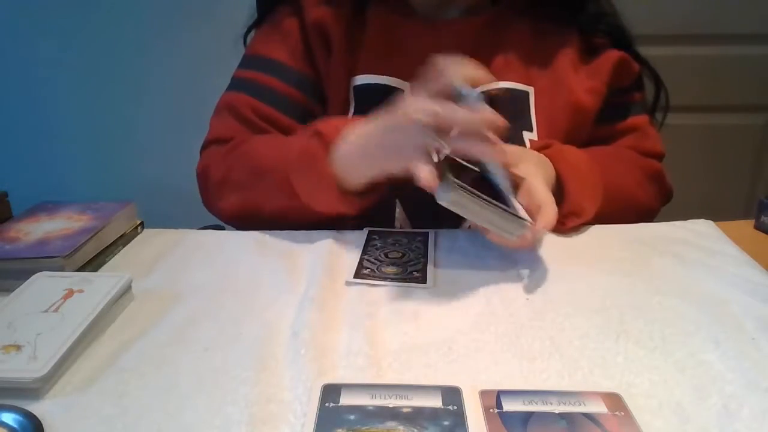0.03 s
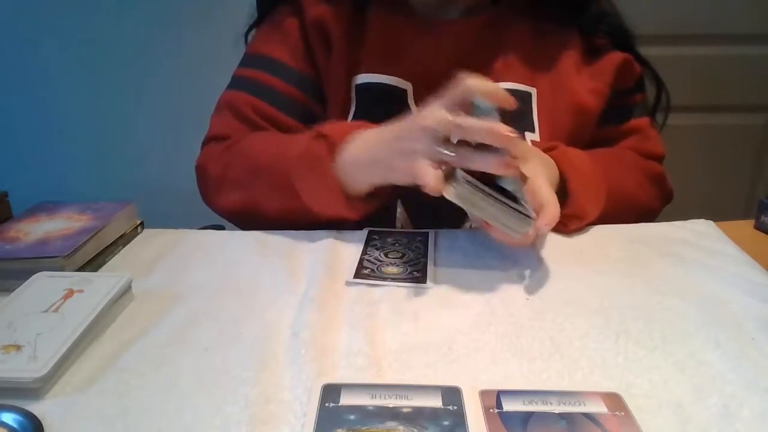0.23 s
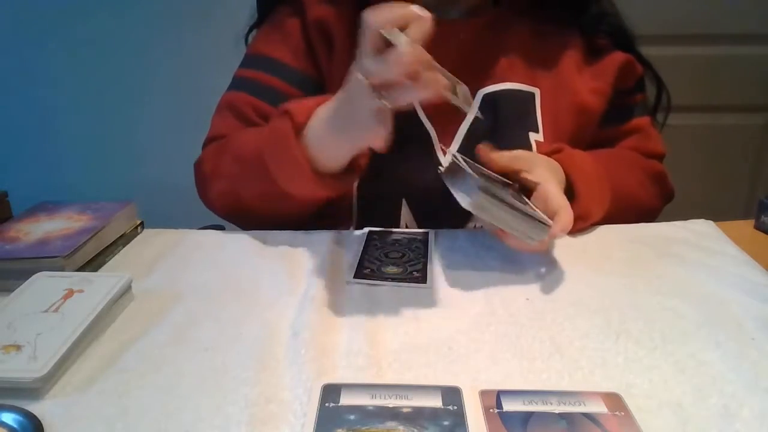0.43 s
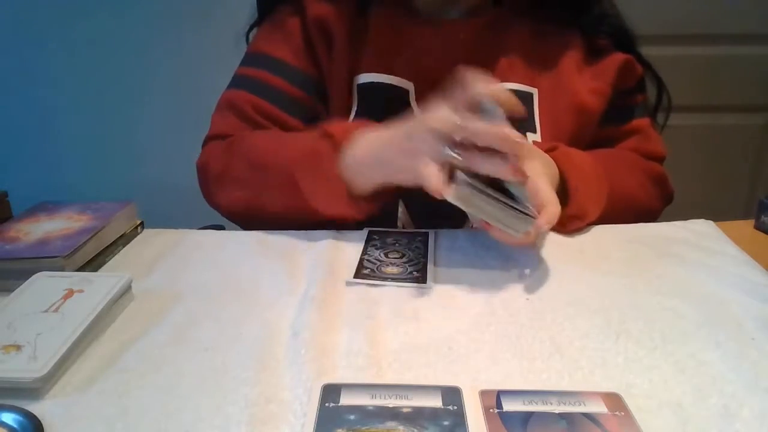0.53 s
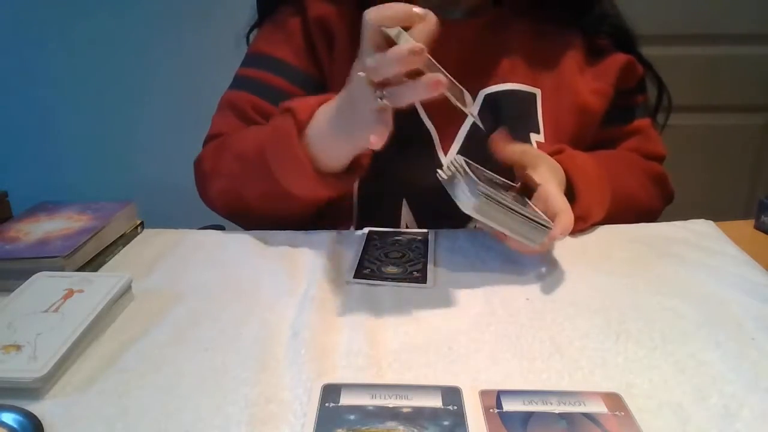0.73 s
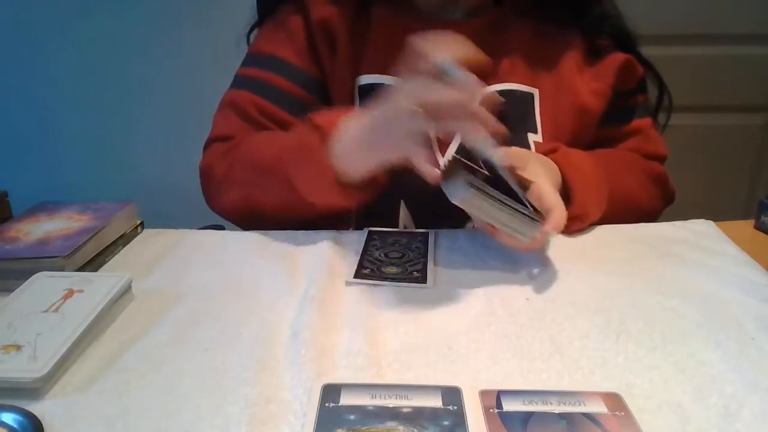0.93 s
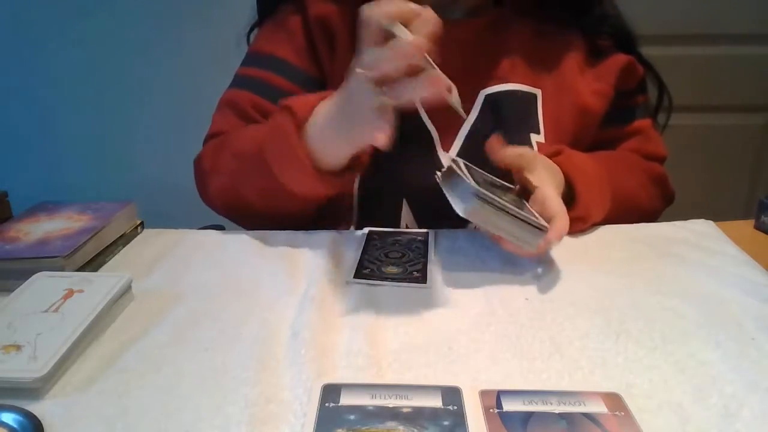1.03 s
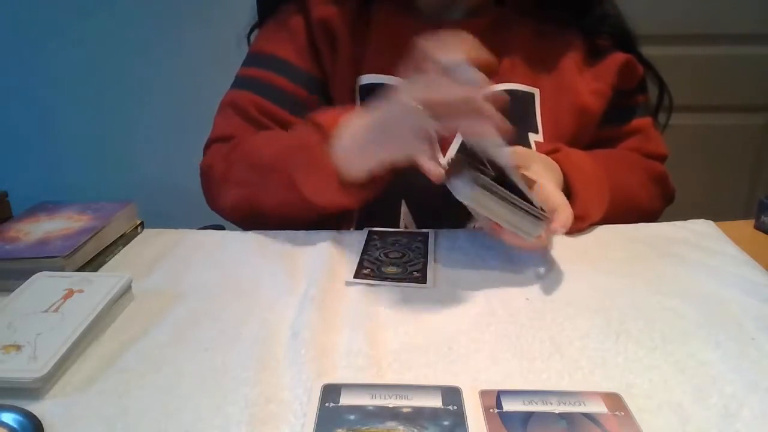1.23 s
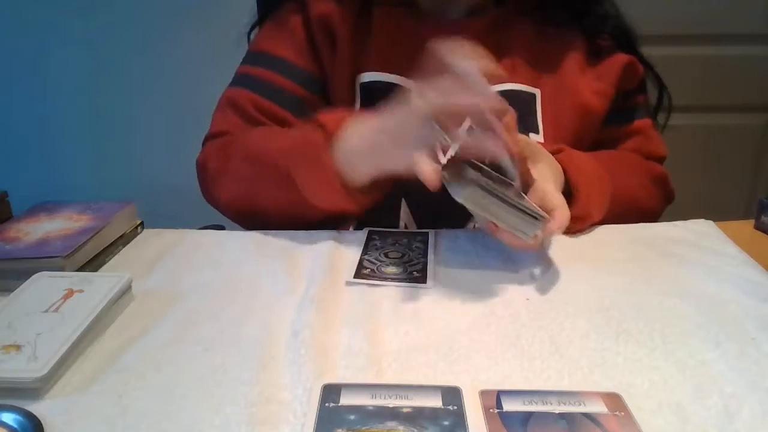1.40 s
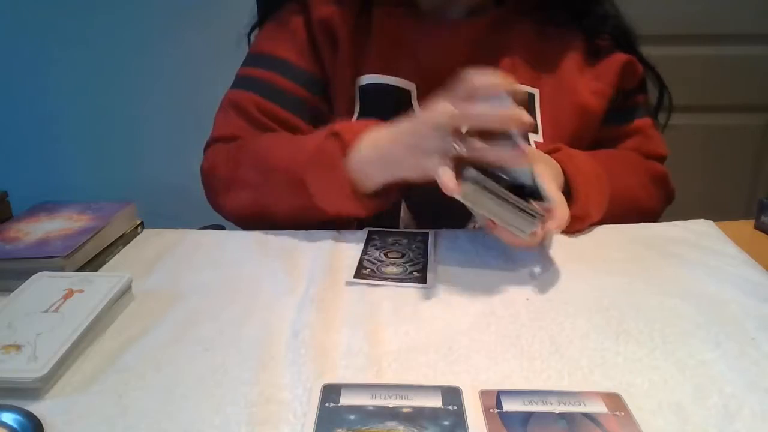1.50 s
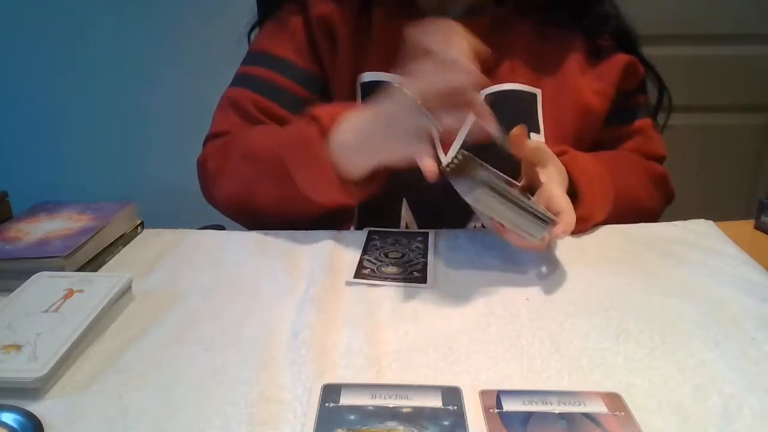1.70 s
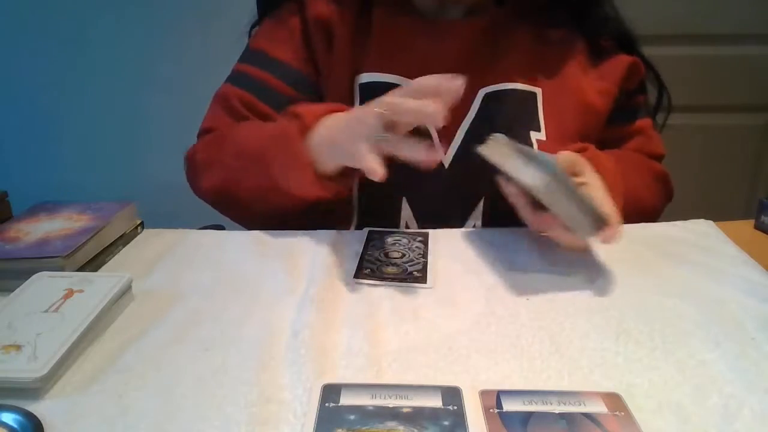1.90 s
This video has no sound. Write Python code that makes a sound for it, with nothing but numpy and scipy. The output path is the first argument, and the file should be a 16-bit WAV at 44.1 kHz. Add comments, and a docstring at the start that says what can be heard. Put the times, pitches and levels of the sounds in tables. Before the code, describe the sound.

A deck of cards is shuffled overhand in a small, quiet room. Packets slide off with a short papery hiss and slap onto the pile in an uneven run, ending with a soft landing.

```python
"""A deck of cards is shuffled overhand above a cloth-covered table in a small, faintly rumbling room.
From the start, packets slide off the deck with a papery hiss and land on the pile with a slap:
the air between cards and palm thuds and rings, then a wall throws the slap back.
The first slaps are light; the hardest come near 0.5, 0.7, 1.1 and 1.7 s.
A last short slide and a soft landing end the shuffle at 1.9 s."""
import sys
import numpy as np
from scipy import signal
from scipy.fft import rfft, irfft
from scipy.io import wavfile
from scipy.ndimage import uniform_filter1d

SR = 44100
rng = np.random.default_rng(int(sys.argv[2]) if len(sys.argv) > 2 else 0)


def digitize_waveform(pressure):
    """Quantize a signal to 16-bit integers and store it at the path in sys.argv[1].

    Rows of a 2-D input are taken as channels; values are limited to [-1, 1].
    """
    field = np.atleast_2d(pressure).T
    bounded = np.clip(field, -1, 1)
    quanta = np.round(bounded * 32767).astype(np.int16)
    wavfile.write(sys.argv[1], SR, quanta)


N = 85995


def amp(db):
    """Decibels to gain."""
    return 10 ** (np.asarray(db) / 20)


def lookup(points, hz):
    """Interpolates a table on a log-frequency axis."""
    freqs, values = np.transpose(points)
    return np.interp(np.log(hz + 1), np.log(freqs), values)


def add(mix, start_s, sound):
    """Mixes a stereo sound in at start_s."""
    part = mix[:, max(round(start_s * SR), 0):][:, :sound.shape[1]]
    part += sound[:, :part.shape[1]]


def unit(x):
    """Scales to unit energy per channel."""
    return x / np.sqrt(np.sum(x ** 2, -1, keepdims=True) + 1e-20)


def butter(x, hz, kind):
    """Causal band-pass or high-pass."""
    return signal.lfilter(*signal.butter(2, hz, kind, fs=SR), x)


def colour(x, spectrum, size=2048):
    """Minimum-phase filter with the given spectrum."""
    log_gain = np.log(amp(lookup(spectrum, abs(np.fft.fftfreq(size, 1 / SR)))))
    taps = np.fft.ifft(np.exp(np.conj(signal.hilbert(log_gain)))).real[:size // 2]
    return signal.fftconvolve(x, taps[None], axes=1)[:, :x.shape[1]]


# Still room. Each row: frequency in Hz, relative level in dB.
RUMBLE_SPECTRUM = [(20, -4), (45, -6.5), (80, -16), (200, -22.5), (600, -28), (2000, -39), (16000, -47)]

def room_rumble(rms_db=-69):
    """Faint rumble of the still room."""
    mid, side = rng.standard_normal((2, N))
    noise = np.array([mid + .71 * side, mid - .6 * side])
    return amp(rms_db) * np.sqrt(N) * unit(colour(noise, RUMBLE_SPECTRUM, size=8192))


# Tail decay. Each row: frequency in Hz, time to fall 60 dB in seconds.
TAIL_T60 = [(150, 0.03), (450, 0.35), (900, 0.21), (2800, 0.2571), (7000, 0.18), (15000, 0.16)]
# Tail colour. Each row: frequency in Hz, gain in dB.
TAIL_SPECTRUM = [(100, 0), (250, -0.5), (480, -3), (900, -1.5), (2500, -4.5), (5000, -8), (9000, -6),
                 (15000, -9)]

def room_tail(t, rise_s=.0066, narrow_below_hz=910, bass_width=.5):
    """Impulse response of the short diffuse tail, narrower in the bass."""
    hz, frame_s, (mid, side) = signal.stft(rng.choice([-1., 1.], (2, len(t))), SR, nperseg=256)
    width = np.maximum(hz / np.hypot(hz, narrow_below_hz), bass_width)[:, None]
    noise = np.array([mid + width * side, mid - width * side]) / np.hypot(1, width)
    t60_s = lookup(TAIL_T60, hz)[:, None]
    decaying = noise * amp(-60 * frame_s / t60_s) / np.sqrt(t60_s)
    tail = signal.istft(decaying, SR, nperseg=256)[1][:, :len(t)]
    return colour(unit(tail * (1 - np.exp(-t / rise_s))), TAIL_SPECTRUM)


# Wall reflection. Each row: frequency in Hz, gain in dB.
WALL_SPECTRUM = [(100, 3), (300, -2), (800, -4.5), (1500, -16.5), (3000, -15.5), (6000, -23),
                 (15000, -24.5)]

def wall_echo(t, delay_s=.0232, spread_s=.0022):
    """Impulse response of the wall: one clear echo with scatter around it."""
    scatter = rng.standard_normal((2, len(t))) * np.exp(-abs(t - delay_s) / spread_s)
    echo = unit(butter(scatter, 910, "high"))
    echo[:, round(delay_s * SR)] += 1
    return colour(echo, WALL_SPECTRUM)


def friction(envelope, width, grain_s=.0012, grain_db=2.5, catches_per_s=260, catch_db=15):
    """Grainy stereo paper friction; card edges catch on each other now and then."""
    size = len(envelope)
    mid, side, grain = rng.standard_normal((3, N))[:, :size]
    side = butter(side, 1110, "high")  # mono bass
    grain_size = round(grain_s * SR)
    grain = uniform_filter1d(grain, grain_size) * np.sqrt(grain_size)
    catches = (rng.random(N) < catches_per_s / SR) * rng.random(N)
    catches = np.convolve(catches[:size], signal.windows.hann(12), "same")
    grip = amp(grain_db * grain) + amp(catch_db) * catches
    return envelope * grip * np.array([mid + width * side, mid - width * side])


def air_gap(envelope, lowest_hz, step_hz=1226, step_db=-6):
    """Friction rings the air gap between the cards at four resonances, the higher ones wider."""
    drive = friction(envelope, width=.85)
    ring = 0
    for k in range(4):
        centre_hz = lowest_hz + k * step_hz
        half_band_hz = (120 + .07 * centre_hz) / 2
        ring += amp(k * step_db) * butter(drive, [centre_hz - half_band_hz, centre_hz + half_band_hz], "band")
    return unit(ring)


def moving_contact(hiss, depth_db=4, patch_hz=700, patch_s=.06, size=512):
    """The hiss shifts colour in random patches as the contact moves."""
    bins = signal.stft(hiss, nperseg=size)[2]
    patches = rng.standard_normal((bins.shape[1], 64))
    patches = uniform_filter1d(patches, round(patch_hz * size / SR), axis=0)
    patches = uniform_filter1d(patches, round(patch_s * SR / size), axis=1)
    gain = amp(depth_db * patches[:, :bins.shape[2]] / patches.std())
    return signal.istft(bins * gain, nperseg=size)[1][:, :hiss.shape[1]]


# Card sliding on card. Each row: frequency in Hz, relative level in dB.
HISS_SPECTRUM = [(100, -16), (400, -17), (1000, -25), (2500, -18), (4000, -18), (6500, -9.5), (8500, 1),
                 (11500, 0), (15000, -1)]
# Sliding packets. Each row: start, fastest point and stop in seconds, hiss in dB, swell in dB,
# gap ring in Hz, ring in dB.
PACKET_SLIDES = [ (0.000, -0.004, 0.054, -71, 14, 500, -63.5), (0.05, 0.046, 0.100, -47, 11, 5400, -70),
                 (0.113, 0.171, 0.205, -57.5, 13.5, 1500, -77),
                 (0.34, 0.359, 0.402, -40, 17.5, 5160, -48.5), (0.420, 0.5, 0.512, -38, 23.5, 4870, -44.5),
                 (0.742, 0.783, 0.826, -36.5, 17, 4900, -52), (0.958, 0.977, 0.992, -42.5, 19.5, 4960, -54),
                 (0.999, 1.018, 1.090, -50.5, 11.5, 1490, -51),
                 (1.036, 1.054, 1.095, -44, -1.5, 4600, -51.5),
                 (1.247, 1.268, 1.305, -50.5, 12.5, 5600, -55.5),
                 (1.309, 1.355, 1.400, -45.5, 8.5, 4430, -56.5),
                 (1.553, 1.571, 1.612, -43.5, 16, 4430, -58),
                 (1.620, 1.669, 1.686, -38.5, 13.5, 4750, -42.5),
                 (1.640, 1.682, 1.690, -40.5, 24, 2400, -49), (1.884, 1.897, 1.950, -46, 31, 2600, -74.5), ]

def slide(start_s, fastest_s, stop_s, hiss_db, swell_db, ring_hz, ring_db, fade_s=.0026):
    """A packet slides over the deck: the hiss swells with its speed and eases off."""
    t = np.arange(start_s, stop_s + 10 * fade_s, 1 / SR)
    touch = np.minimum((t - start_s) / fade_s, 1) * np.exp(-np.maximum(t - stop_s, 0) / fade_s)
    speed = touch * amp(np.interp(t, [start_s, fastest_s, stop_s], [-swell_db, 0, -swell_db]))
    hiss = unit(moving_contact(colour(friction(speed, width=.6), HISS_SPECTRUM)))
    ring = air_gap(speed, ring_hz)
    return start_s, (amp(hiss_db) * hiss + amp(ring_db) * ring) * np.linalg.norm(speed)


def palm_thud(t, hz, rise_s=.0005, decay_s=.0018, sag=.12):
    """Trapped air thuds briefly and drops in pitch; the soft palm confines it to a band."""
    age_s = np.maximum(t, 0)
    decay = np.exp(-age_s / decay_s)
    cycles = np.cumsum((t > 0) * hz * (1 + sag * (2 * decay - 1))) / SR
    thud = (1 - np.exp(-age_s / rise_s)) * decay * np.cos(2 * np.pi * cycles)
    return unit(butter(thud, [.35 * hz, 1.7 * hz], "band"))


# Flat faces meeting, and card edges. Each row: frequency in Hz, relative level in dB.
CLAP_SPECTRUM = [(100, -24), (300, -20), (540, -15), (850, 2), (2000, 0), (3200, 1), (4500, -9.5),
                 (7500, -11), (16000, -16)]
TICK_SPECTRUM = [(200, -29), (1500, -16.5), (3500, -9.5), (5000, -2.5), (7500, -2), (10000, -1.5),
                 (13000, -1.5), (16000, -1.5)]
# Landing packets. Each row: start in seconds, decay in seconds, thud in Hz, thud in dB, clap in dB,
# gap ring in Hz, ring in dB, edge tick in dB, left over right in dB, room send in dB.
PACKET_SLAPS = [ (0.059, .003, 240, -44, -39.5, 5400, -27, -16, -3.5, 5),
                (0.205, 0.0083, 870, -36, -39, 1590, -31.5, -40, 3, -3),
                (0.2136, 0.0018, 520, -19.5, -27, 5490, -14, -20.5, -2, -0.5),
                (0.2372, .0015, 780, -17, -43, 5600, -44, -29, 0, -5),
                (0.3517, 0.0032, 300, -39, -30, 5030, -20.5, -13, -1.5, -0.5),
                (0.389, 0.0052, 260, -36.5, -32.5, 1450, -33, -22.5, -6, -2.5),
                (0.5034, 0.0028, 380, -12, -25, 2630, -13, -3, -0.5, -1),
                (0.6602, 0.00084, 295, -45, -27, 3220, -28.5, -23, -2, -4),
                (0.673, 0.0013, 260, -24, -2, 2900, -14, -5.5, 0, 0),
                (0.797, 0.0083, 520, -26, -27, 900, -29, -31, -0.5, 1.5),
                (0.809, .0012, 306, -34.5, -37, 1960, -38, -16, -1.5, -6),
                (0.988, 0.0067, 317, -24.5, -22.5, 3790, -13, -9, -3.5, 2.5),
                (0.996, 0.0028, 325, -26.5, -21.5, 1366, -11, -10.5, 0, -0.5),
                (1.094, 0.0031, 380, -13, -6, 3950, -12, -17, 0.5, 1),
                (1.1011, 0.0034, 680, -12, -9.5, 4870, -9, -3.5, 1, 1),
                (1.262, 0.0062, 338, -32, -32.5, 5470, -21.5, -13, -1.5, 7.5),
                (1.285, .003, 270, -20, -36, 4170, -17.5, -15, -1.5, -4),
                (1.395, 0.007, 540, -20, -31.5, 1970, -22.5, -18, 0.5, -2.5),
                (1.57, 0.0045, 298, -39.5, -36, 5650, -23, -21, -2, 6),
                (1.586, 0.0083, 270, -20, -36, 4360, -28, -13.5, 1, -4),
                (1.648, 0.0013, 403, -44, -42, 2520, -25.5, -21, 1.5, -3),
                (1.6815, .003, 420, -23, -32, 2300, -21, -13, -1, -5),
                (1.6851, 0.0013, 490, -13, -22, 3660, -12.5, -2, -0.5, -7),
                (1.900, 0.0072, 600, -30, -48, 1190, -39.5, -33, 4.5, 3),
                (1.927, .005, 265, -28.5, -42, 2670, -26, -38, 0.5, 0), ]

def slap(start_s, decay_s, thud_hz, thud_db, clap_db, ring_hz, ring_db, tick_db, pan_db):
    """A packet lands: trapped air thuds and rings, the faces clap, the edges tick."""
    lead_s, rise_s, brush_s = .015, .00026, .0043
    t = np.arange(3000) / SR - lead_s
    age_s = np.maximum(t, 0)
    brush = amp(-19) * np.exp(-abs(t) / brush_s)  # cards brush just before landing
    blow = (1 - np.exp(-age_s / rise_s)) * np.exp(-age_s / decay_s) + brush
    faces = unit(friction(blow, width=.55))
    faces[:, round((lead_s + rise_s) * SR)] += 1  # faces meet in one clean pulse
    thud = amp(thud_db) * palm_thud(t, thud_hz)
    clap = amp(clap_db) * unit(colour(faces, CLAP_SPECTRUM))
    ring = amp(ring_db) * air_gap(blow, ring_hz)
    tick = amp(tick_db) * unit(colour(friction(blow, width=.74), TICK_SPECTRUM))
    return start_s - lead_s, (thud + clap + ring + tick) * amp([[pan_db / 2], [-pan_db / 2]])


# Stereo phase of the direct sound. Each row: frequency in Hz, left lead in radians.
LEFT_PHASE = [(950, -0.24), (2150, -0.94), (3400, -1.27), (5400, -0.65), (7000, -0.24), (16000, 0.27)]

def scene():
    """Slaps and slides, their reflections and the room's rumble."""
    direct, send = np.zeros((2, 2, N))
    for *row, send_db in PACKET_SLAPS:
        start_s, sound = slap(*row)
        add(direct, start_s, sound)
        add(send, start_s, amp(send_db) * sound)
    for row in PACKET_SLIDES:
        start_s, sound = slide(*row)
        add(direct, start_s, sound)
        add(send, start_s, sound)
    lead_rad = lookup(LEFT_PHASE, np.fft.rfftfreq(N, 1 / SR))
    direct[0] = irfft(rfft(direct[0]) * np.exp(1j * lead_rad), N)
    t = np.arange(20000) / SR
    reflections = signal.fftconvolve(send, room_tail(t) + wall_echo(t), axes=1)[:, :N]
    return direct + reflections + room_rumble()


def record(dry):
    """Steep low-pass at 15.9 kHz."""
    taps = signal.firwin(511, 15900, window=("kaiser", 9), fs=SR)
    return signal.oaconvolve(dry, taps[None], "same")


dry = scene()
out = record(dry)
digitize_waveform(out)
```